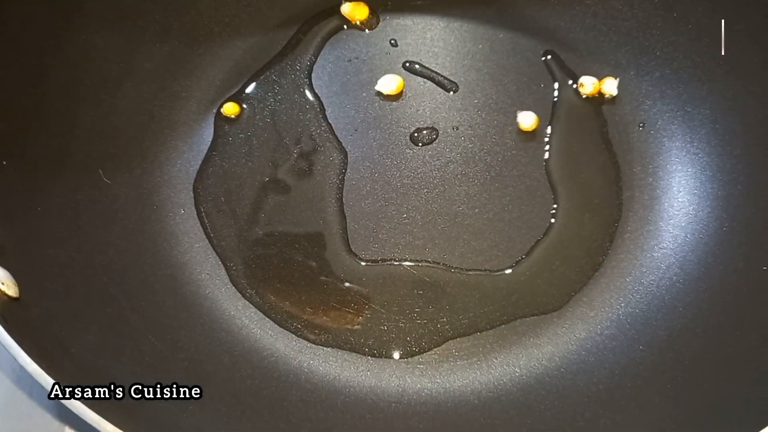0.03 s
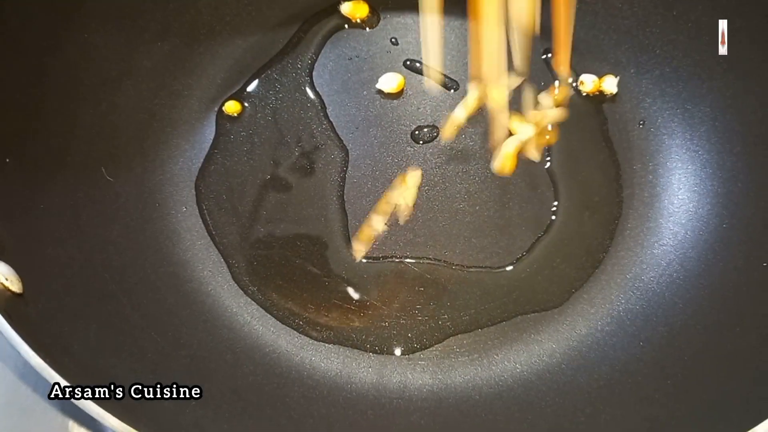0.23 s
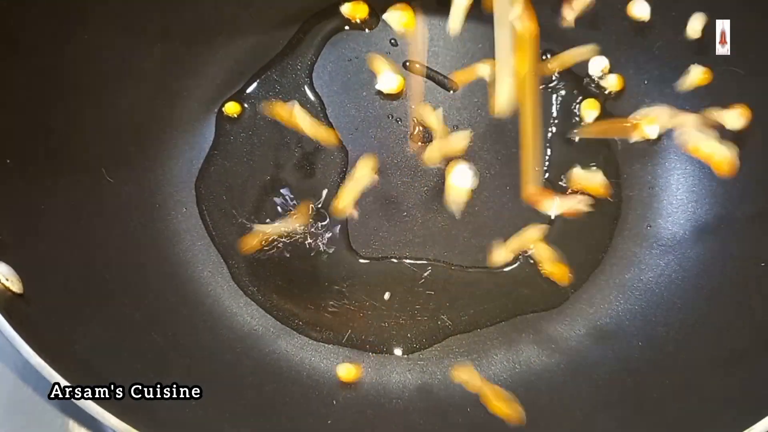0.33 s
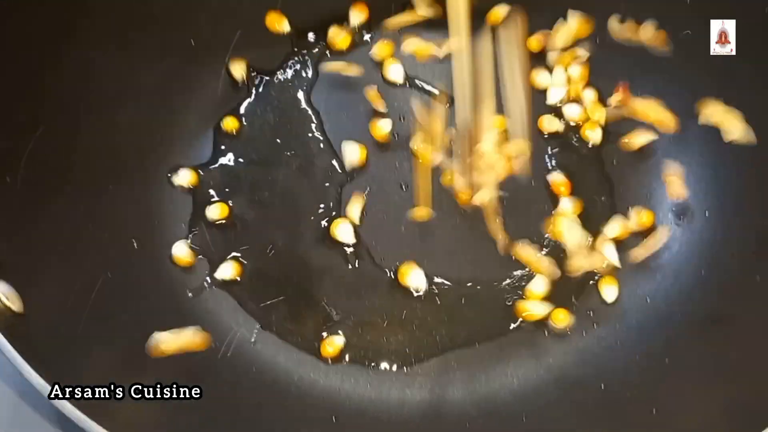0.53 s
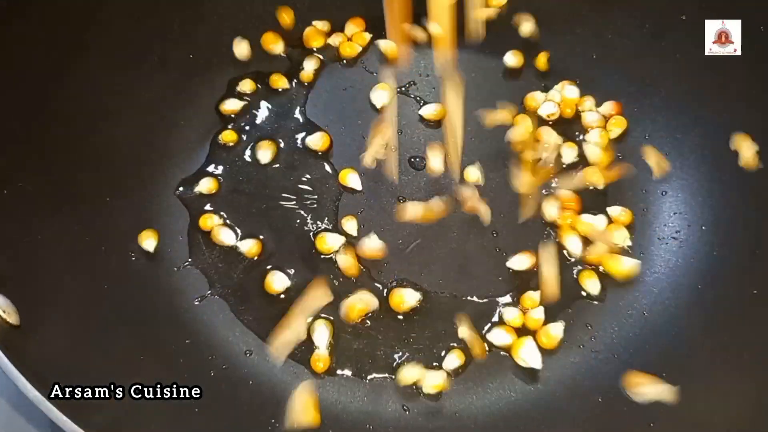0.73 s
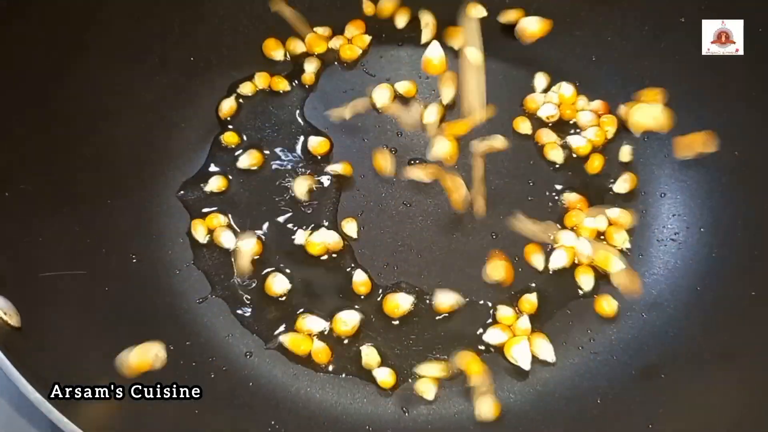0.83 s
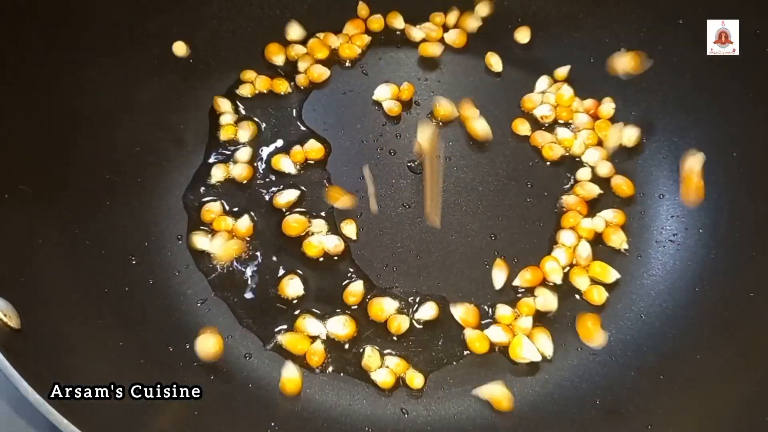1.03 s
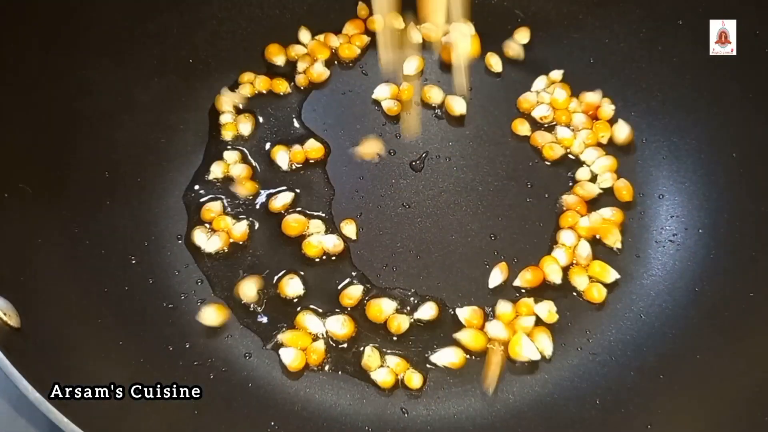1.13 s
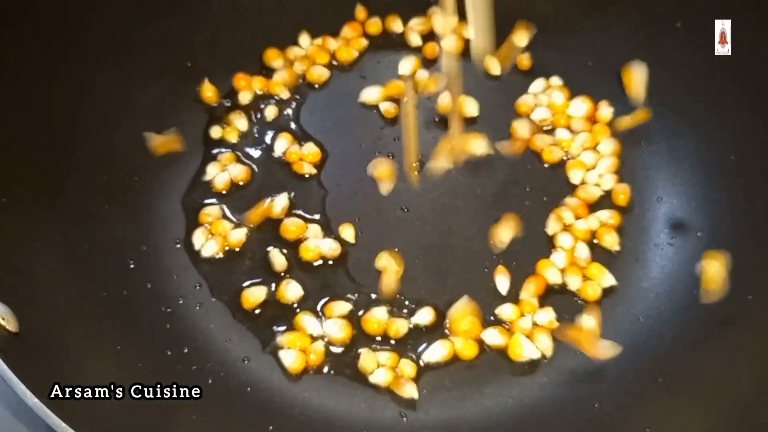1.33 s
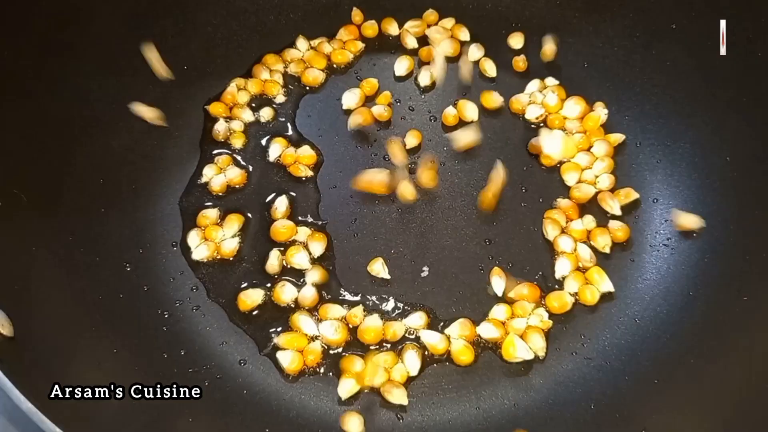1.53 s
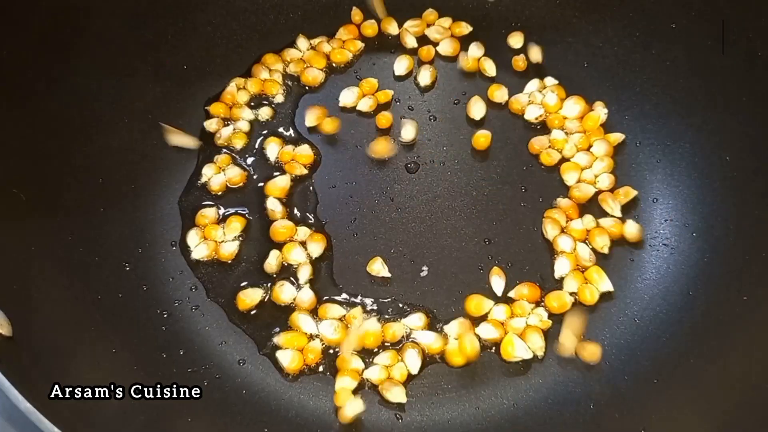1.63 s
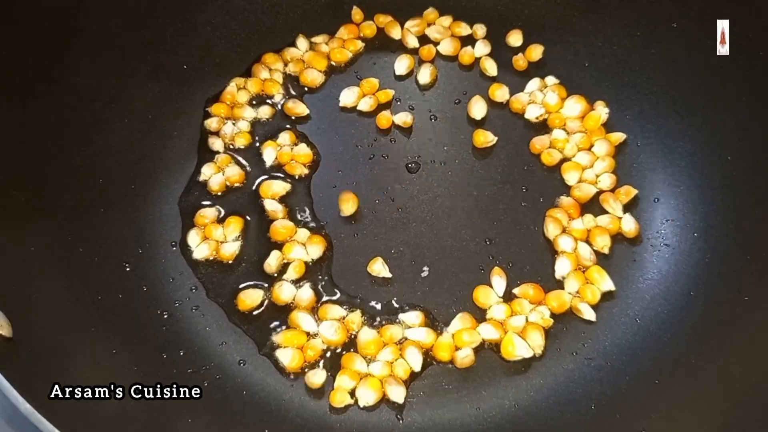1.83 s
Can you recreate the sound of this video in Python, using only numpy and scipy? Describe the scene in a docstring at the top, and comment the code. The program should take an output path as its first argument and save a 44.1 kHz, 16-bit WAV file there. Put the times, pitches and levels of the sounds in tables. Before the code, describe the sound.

Dry corn kernels rattle and clatter as they pour into a metal pan.

```python
"""In a quiet kitchen, dry corn kernels are poured into an oiled metal pan close to the microphone:
one long rush, a short second one, and then the last kernels settle. Each kernel gives a bright
tick, a duller knock and a short ring of the pan, and lighter bounces rattle in between.
During the heaviest hits, low thuds reach the left microphone."""
import sys
import numpy as np
from scipy import signal
from scipy.fft import rfft, irfft
from scipy.io import wavfile

SR = 44100
rng = np.random.default_rng(int(sys.argv[2]) if len(sys.argv) > 2 else 0)


def bounce(signal):
    """Save signal as a 16-bit WAV file at the path given by the first command-line argument."""
    frames = np.transpose(np.atleast_2d(signal))
    limited = np.clip(frames, -1, 1)
    pcm = np.round(limited * 32767).astype(np.int16)
    wavfile.write(sys.argv[1], SR, pcm)


N = 83790
HZ = np.fft.rfftfreq(2 * N, 1 / SR)  # the frequencies of every tone curve
RING_T = np.arange(5120) / SR  # seconds since a hit
TOP_HZ = 15850


def amp(db):
    """Turns decibels into a gain."""
    return 10 ** (np.asarray(db) / 20)


def tone_curve(points):
    """Joins (Hz, dB) points into a curve of level against frequency."""
    hz, db = np.transpose(points)
    return np.interp(np.log(HZ + 1), np.log(hz), db)


def keep_power(db):
    """Shifts a tone curve so that it leaves the power of white noise unchanged."""
    return db - 10 * np.log10(np.mean(amp(db) ** 2))


def colour(x, db):
    """Filters a sound by a tone curve, with no ringing ahead of a hit."""
    log_gain = np.log(amp(db))
    phase = -signal.hilbert(np.r_[log_gain, log_gain[-2:0:-1]]).imag[:len(HZ)]
    return irfft(rfft(x, 2 * N) * np.exp(log_gain + 1j * phase))[..., :N]


def add(mix, start, sound):
    """Mixes a sound in at a start time in seconds."""
    part = mix[:, max(round(start * SR), 0):][:, :sound.shape[1]]
    part += sound[:, :part.shape[1]]


def kitchen_hiss():
    """The room's faint, steady hiss."""
    # The tone of the hiss. Each row: frequency in Hz, relative level in dB.
    hiss_tone = [(30, -12), (160, -10), (700, -19), (3800, -26), (15000, -28.5)]
    hiss = colour(rng.standard_normal((2, N)), tone_curve(hiss_tone))
    return amp(-60.5) * hiss / np.sqrt(np.mean(hiss ** 2))


def kernel_hits(bounces=520):
    """Lists every time a kernel strikes the pan: the clear hits, then light random bounces."""
    # The clear hits. Each row: start in seconds, relative tick and knock levels in dB.
    clear_hits = [(0.0174, -27.5, -42), (0.2227, -11.5, -32), (0.2517, -18.5, -23), (0.2703, -8, -22),
                  (0.2947, -7.5, -21.5), (0.3004, -10, -21.5), (0.3172, -5, -32.5), (0.3244, -9.5, -18.5),
                  (0.3454, -13, -23.5), (0.3686, -12, -57), (0.3745, -8.5, -18.5), (0.4048, -5, -56),
                  (0.4182, -7, -17.5), (0.4231, -4.5, -21.5), (0.4514, -8.5, -69), (0.4813, -7.5, -36),
                  (0.5097, -4, -16.5), (0.5427, -11.5, -32), (0.5711, -12, -22.5), (0.608, -7, -24.5),
                  (0.6189, -8.5, -21.5), (0.717, -7.5, -22), (0.7622, -17, -32), (0.7751, -12, -25),
                  (0.8114, -6, -17), (0.8231, -11.5, -25), (0.8629, -8, -29), (0.8704, -11.5, -22),
                  (0.9088, -13.5, -27.5), (0.9488, -9.5, -25), (0.9644, -15, -20.5), (0.9822, -16, -25),
                  (1.0004, -15.5, -28), (1.0635, -14, -66), (1.0862, -16, -27), (1.2008, -9, -24),
                  (1.2076, -13, -20), (1.2204, -13.5, -27), (1.254, -12, -24.5), (1.2775, -10.5, -33.5),
                  (1.2965, -10, -25), (1.3034, -15, -26), (1.3362, -15.5, -27), (1.3448, -10, -25),
                  (1.3534, -13.5, -22.5), (1.3618, -8.5, -20), (1.3845, -10, -22), (1.3914, -10, -21),
                  (1.4292, -16.5, -23.5), (1.4549, -8, -27), (1.502, -10, -33), (1.5176, -15.5, -24.5),
                  (1.5693, -15.5, -30.5), (1.5808, -32, -29), (1.5995, -16.5, -48), (1.6154, -22, -31.5),
                  (1.6387, -19.5, -54), (1.6805, -22, -41), (1.7115, -21, -70), (1.7688, -34, -77.5),
                  (1.8303, -33.5, -54)]
    # How the rattle swells and fades. Each row: time in seconds, relative level in dB.
    rattle = [(.215, -54), (.235, -16), (.29, -13.5), (.55, -13.5), (.68, -16.5), (1.0, -21), (1.18, -34),
              (1.24, -28), (1.37, -20), (1.45, -21), (1.62, -23.5), (1.73, -36), (1.77, -65)]
    delay, size = rng.random((2, bounces))
    starts = (np.arange(bounces) + 2 * delay) / bounces * N / SR
    scatter_db = 5.5 * (np.minimum(-np.log(size), 2) - 1)
    tick_db = np.interp(starts, *np.transpose(rattle)) - 6 + scatter_db
    knock_db = tick_db - 11
    return np.vstack([clear_hits, np.c_[starts, tick_db, knock_db]])


def wall_tones(spacing_hz=85.15):
    """The many close, weak tones at which the pan wall vibrates, one row each."""
    steps = np.arange(int(TOP_HZ / spacing_hz))
    place, phase = rng.random((2, len(steps)))
    hz = (steps + place) * spacing_hz
    return np.sin(2 * np.pi * (hz[:, None] * RING_T + phase[:, None])) * np.sqrt(2 / len(steps))


def shiver(noise, spacing_hz=452.4, spread_db=7.5):
    """Gives one hit its own pitch by lifting and lowering random frequency bands."""
    hz = np.fft.rfftfreq(noise.shape[1], 1 / SR)
    heights = np.clip(rng.standard_normal(len(hz)), -2, 2)
    db = spread_db * np.interp(hz / spacing_hz, np.arange(len(hz)), heights)
    return irfft(rfft(noise) * amp(keep_power(db)), noise.shape[1])


def clatter(starts, levels_db, walls, t60, tail_db, tail_t60, right_db=0, tail_right_db=0):
    """Each hit sets off a brief shiver and a tail of wall tones, which the piling corn damps."""
    attack_s, right_lag_s, ear_likeness, wall_db_per_s = 0.00049, 0.000295, 0.72, -1
    out, t = np.zeros((2, N)), RING_T
    weights = rng.standard_normal((len(starts), 2, len(walls)))
    tail_fade = amp(tail_db - 60 * t / tail_t60)  # a t60 is the seconds taken to fade by 60 dB
    tails = (weights @ walls) * amp([[0], [tail_right_db]]) * tail_fade
    for start, db, tail in zip(starts, levels_db, tails):
        glancing = rng.random()  # a glancing blow starts more softly and lasts longer
        rise = 1 - np.exp(-t / (attack_s * 3.73 ** glancing))
        fall = amp(-60 * t / (t60 * 2 ** (glancing - 0.5)))
        left, other = shiver(rng.standard_normal((2, len(t))))
        delayed = np.roll(left, round(right_lag_s * SR))
        right = ear_likeness * delayed + np.sqrt(1 - ear_likeness ** 2) * other
        direct = np.array([left, amp(right_db + 1.5 * rng.standard_normal()) * right])
        add(out, start, amp(db) * rise * (fall * direct + amp(wall_db_per_s * start) * tail))
    return out


def ticks(hits, walls, peak_width_hz=316):
    """Hard shells on metal: a bright clatter, lifted where the pan rings in the treble."""
    # The tone of a tick. Each row: frequency in Hz, relative level in dB.
    tick_tone = [(500, -51), (2500, -17.5), (3900, -15.5), (4700, -5.5), (7000, -3.5), (13000, 0),
                 (14200, -11.5), (15700, -10)]
    # The pan's broad, high resonances. Each row: frequency in Hz, lift in dB.
    peaks = [(7350, 5), (8740, 10.5), (9850, 6.5), (10850, 5), (11930, 7.5), (13280, 10), (14620, 18.5)]
    sheen = sum(db / (1 + (2 * (HZ - hz) / peak_width_hz) ** 2) for hz, db in peaks)
    strikes = clatter(hits[:, 0], hits[:, 1], walls, t60=0.02, tail_db=-13, tail_t60=0.092,
                      right_db=-14, tail_right_db=-1.5)
    return amp(3) * colour(strikes, keep_power(tone_curve(tick_tone) + sheen))


def knocks(hits, walls):
    """Each kernel's weight lands on the pan floor: a duller clatter with its bass on the left."""
    # The tone of a knock. Each row: frequency in Hz, relative level in dB.
    knock_tone = [(60, -3.5), (150, -1.5), (480, -15.5), (700, 3), (1000, -6), (1400, 4), (1750, -6.5),
                  (3300, -7.5), (4000, -17), (8000, -17)]
    # Extra filtering on the right. Each row: frequency in Hz, gain in dB.
    right_tone = [(200, -57), (480, -45.5), (650, 1), (1700, -10), (2300, 4.5)]
    strikes = clatter(hits[:, 0], hits[:, 2], walls, t60=0.017, tail_db=-13.5, tail_t60=0.11)
    left, right = colour(strikes, keep_power(tone_curve(knock_tone)))
    return amp(4.5) * np.array([left, colour(right, tone_curve(right_tone))])


def pan_ring(hits, t60=0.115, tick_share=0.27):
    """Every hit rings the same strong tones, each pushed in or out by where the kernel lands."""
    # The pan's strong tones. Each entry: frequency in Hz.
    pan_hz = np.array([618, 1274, 1437, 2030, 2260, 2550, 5010, 6002, 7397, 11959])
    # Their strengths. Each row: relative level in dB, gain on the right (negative flips the wave).
    strengths = [(3.5, 0.61), (3, -2.5), (12, -0.31), (5, 0.1), (-5, 0.66), (0, 0.2), (-2.5, 0.36),
                 (-1, 1.37), (-0.5, 2), (-5, -3)]
    tone_db, right_gain = np.transpose(strengths)
    tones = np.sin(2 * np.pi * pan_hz[:, None] * RING_T) * amp(tone_db[:, None] - 60 * RING_T / t60)
    pushes = rng.choice([-1, 1], (len(hits), len(pan_hz)))
    # As corn covers the pan floor, the upper tones fade and the lowest takes over.
    filling_db_per_s = np.where(pan_hz > pan_hz.min(), -6.5, 2.5)
    out = np.zeros((2, N))
    for (start, tick_db, knock_db), push in zip(hits, pushes):
        db = -14.5 + knock_db + tick_share * (tick_db - knock_db) + filling_db_per_s * start
        add(out, start, amp(db) * np.array([push, push * right_gain]) @ tones)
    return out


def thuds(hits, rise_cycles=0.34, right_db=-46, low_cut_hz=31.5):
    """Low pulses on the left: heavy thuds, each with a higher slap, and a small bump under every hit."""
    # The heavy thuds. Each row: start in seconds, relative level in dB, pitch in Hz.
    heavy = [(0.287, -20.5, 77), (.314, -16, 86), (0.373, -17.5, 164), (0.454, -22.5, 82),
             (0.48, -21.5, 98), (0.501, -21.5, 67.5), (.609, -18, 74), (0.675, -26.5, 52.6),
             (0.715, -24, 75), (.752, -31, 60), (0.81, -20, 93), (0.865, -26, 107), (0.943, -16.5, 92.4),
             (1.068, -28, 51.3), (1.203, -21.5, 172), (1.298, -26.5, 104), (1.343, -21, 122),
             (1.386, -24, 160), (1.46, -28.5, 133), (1.513, -24, 62)]
    slaps = [(start + 0.004, db - 6, 2.9 * hz) for start, db, hz in heavy]
    # The bumps merge into an uneven rumble.
    bumps = [(start, 2.5 + 1.46 * knock_db, 90.6 * 2 ** rng.uniform(-0.87, 1))
             for start, _, knock_db in hits]
    out = np.zeros((2, N))
    for start, db, hz in list(heavy) + slaps + bumps:
        age = RING_T * hz / rise_cycles
        pulse = -age * np.exp(1 - age) * np.sin(2 * np.pi * hz * RING_T)  # lasts about two cycles
        add(out, start, amp([[db], [db + right_db]]) * pulse)
    return amp(4) * signal.lfilter(*signal.butter(2, low_cut_hz, "high", fs=SR), out)


def scene():
    """Mixes the kernels in the pan, the thuds and the quiet kitchen."""
    hits, walls = kernel_hits(), wall_tones()
    return ticks(hits, walls) + knocks(hits, walls) + pan_ring(hits) + thuds(hits) + kitchen_hiss()


def record(dry):
    """Clips any peak above full scale, then cuts the highest treble."""
    low_pass = signal.firwin(255, TOP_HZ, window=("kaiser", 8), fs=SR)
    return signal.oaconvolve(np.clip(dry, -1, 1), low_pass[None], "same")


dry = scene()
out = record(dry)
bounce(out)
```